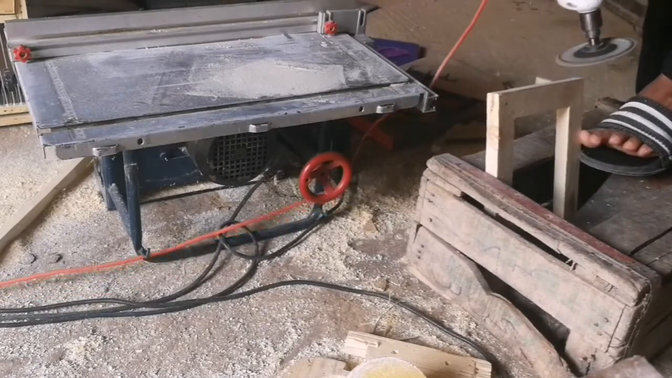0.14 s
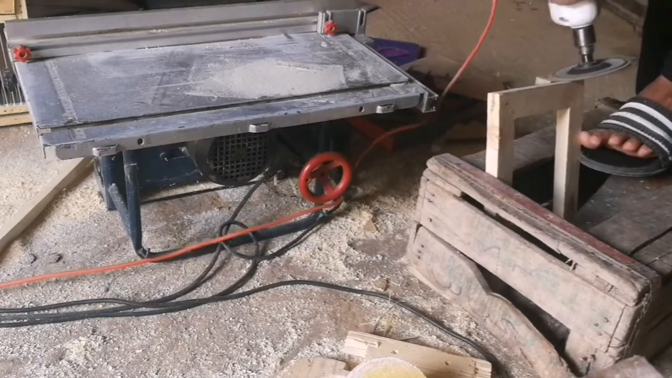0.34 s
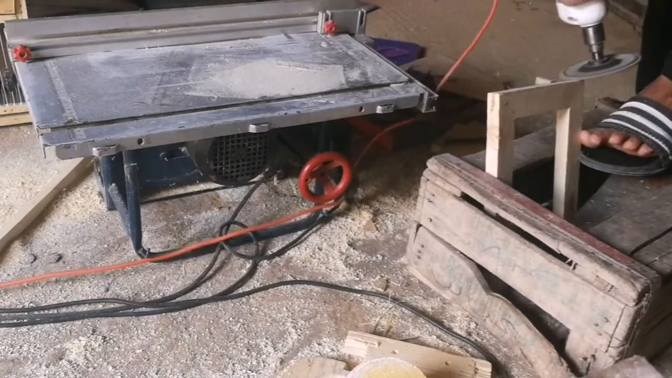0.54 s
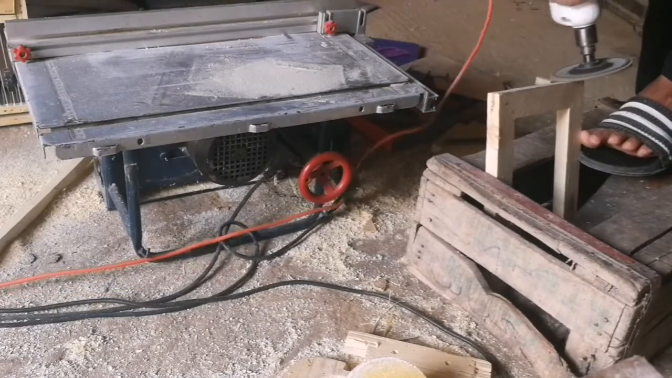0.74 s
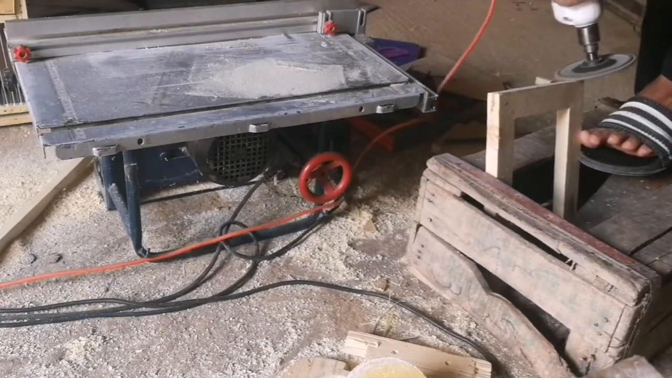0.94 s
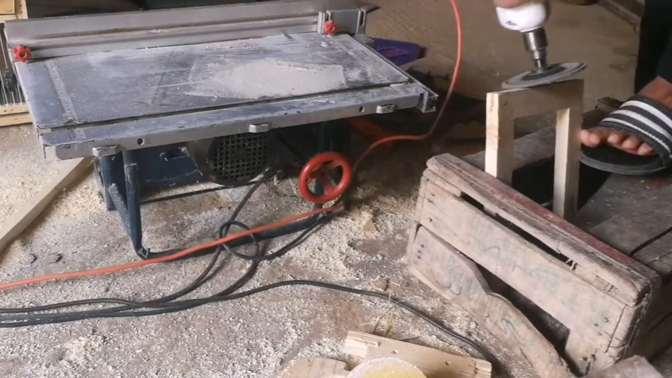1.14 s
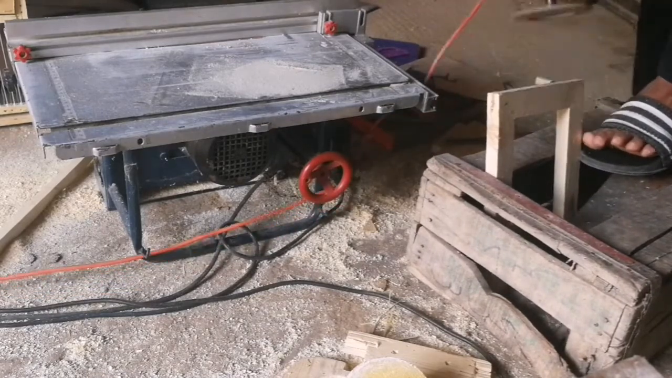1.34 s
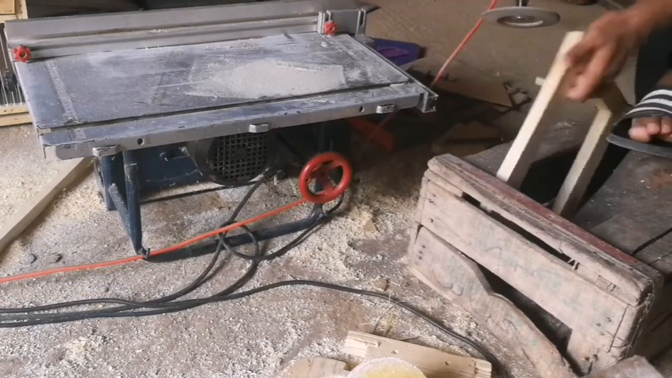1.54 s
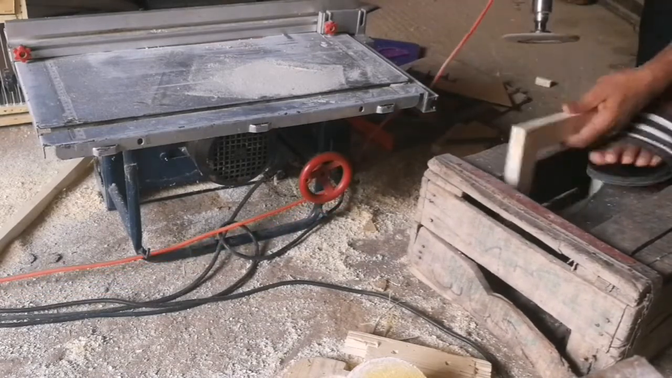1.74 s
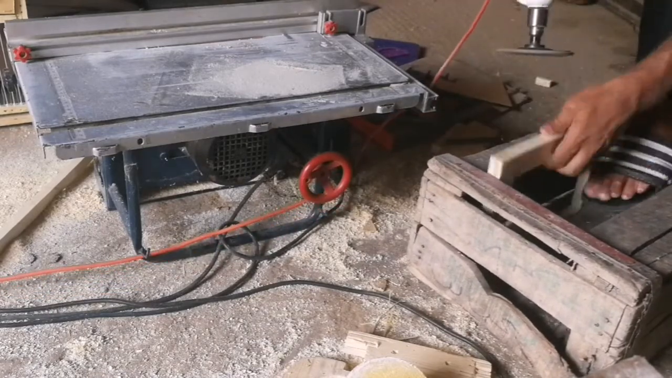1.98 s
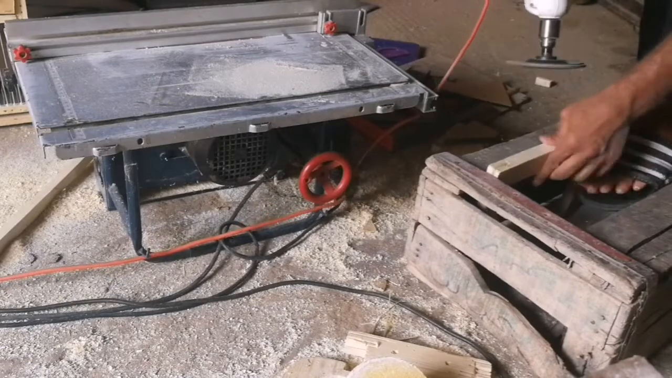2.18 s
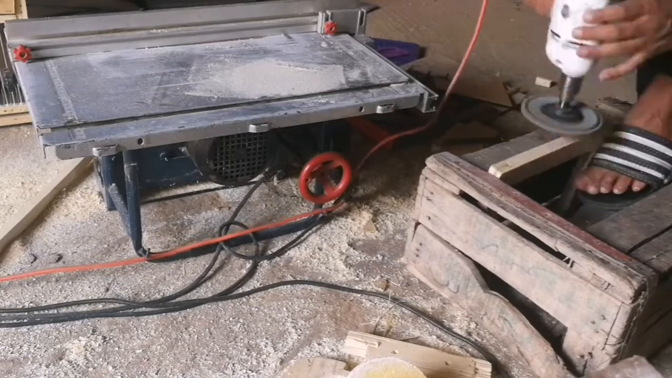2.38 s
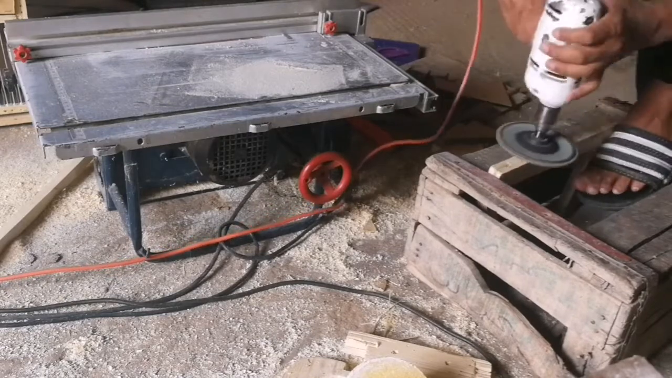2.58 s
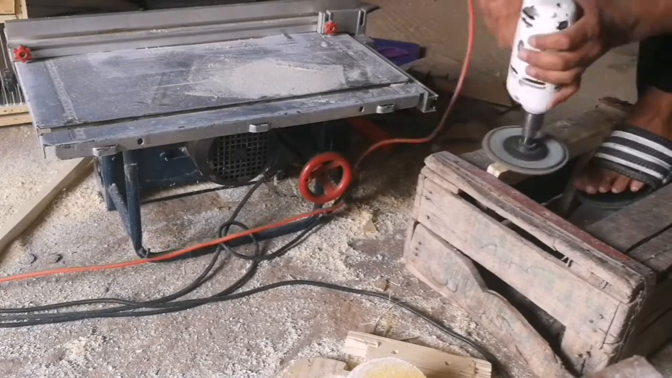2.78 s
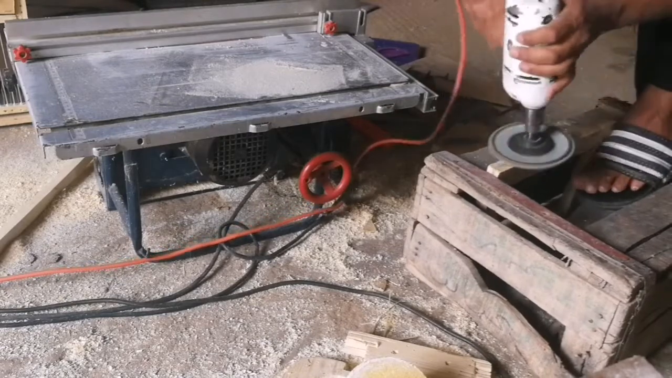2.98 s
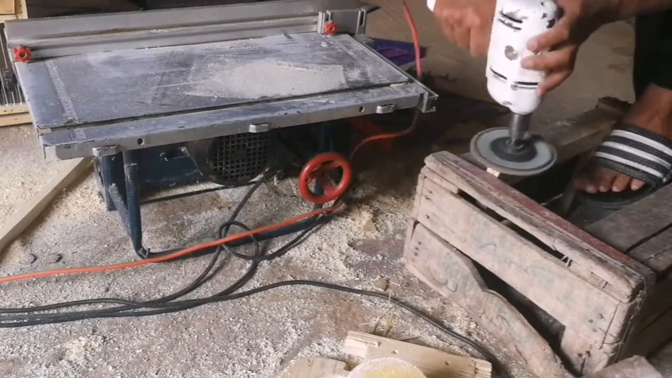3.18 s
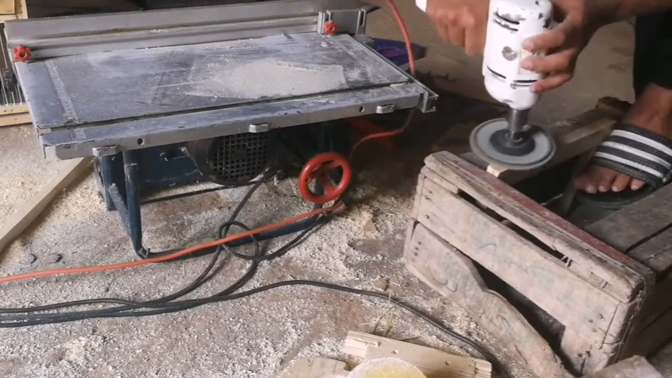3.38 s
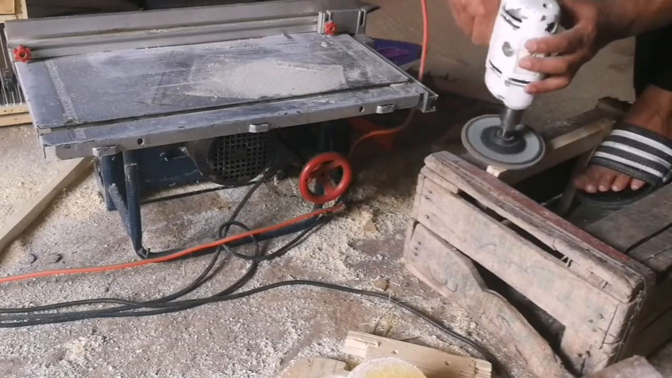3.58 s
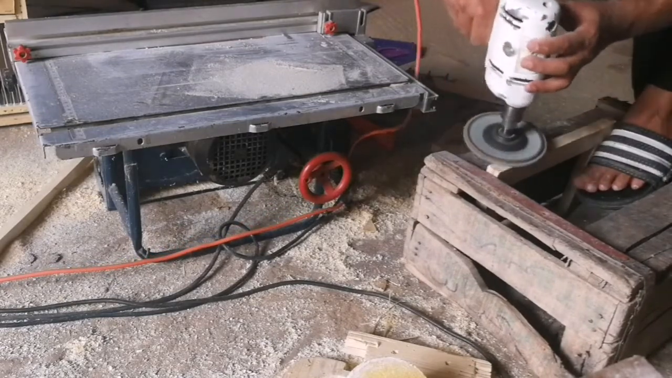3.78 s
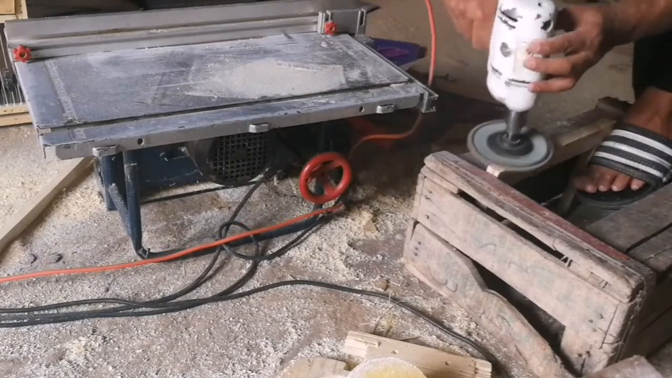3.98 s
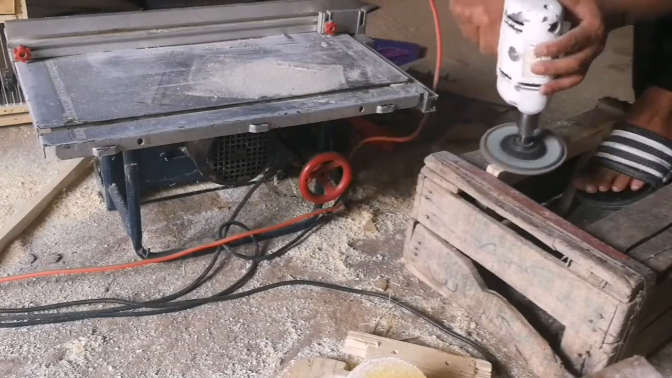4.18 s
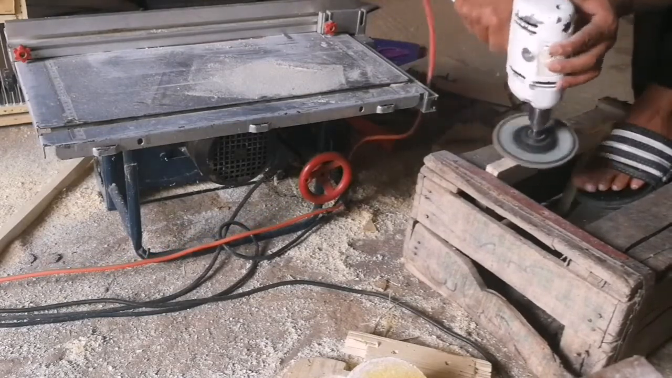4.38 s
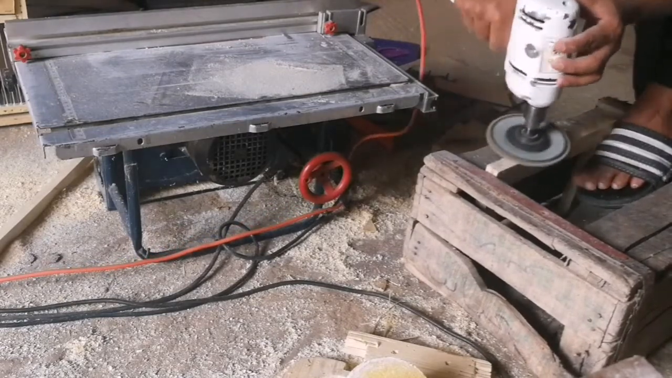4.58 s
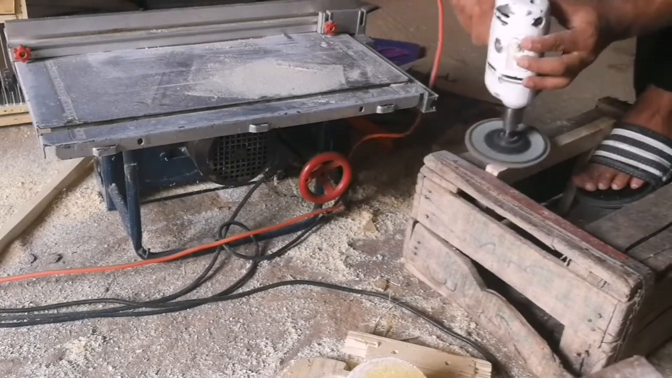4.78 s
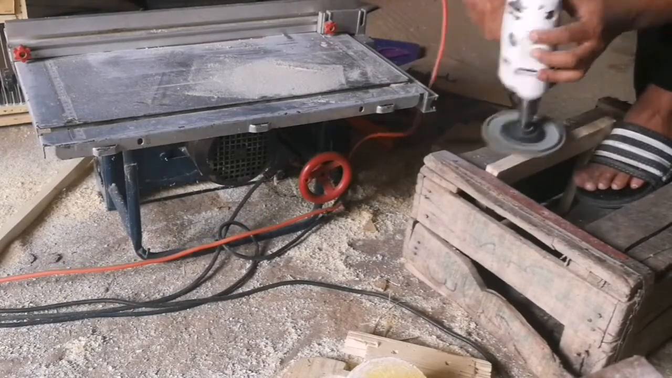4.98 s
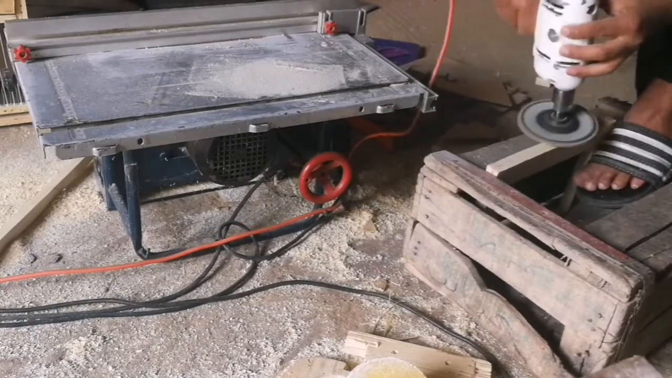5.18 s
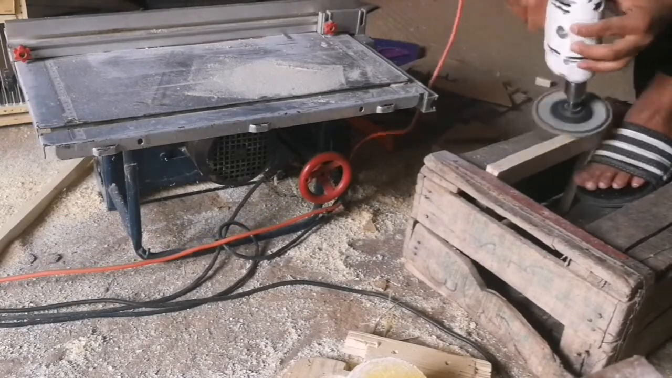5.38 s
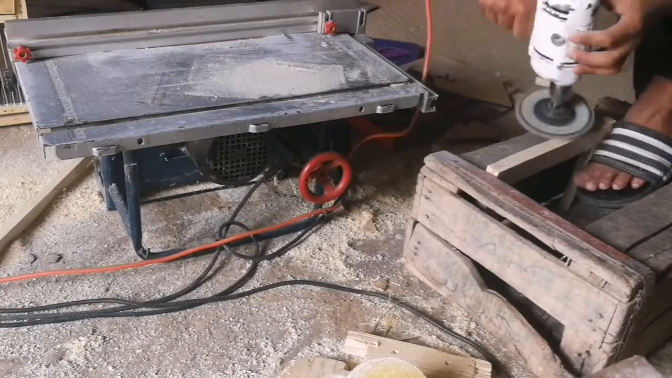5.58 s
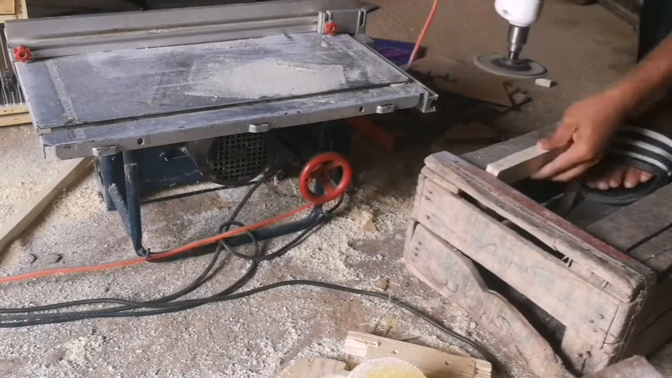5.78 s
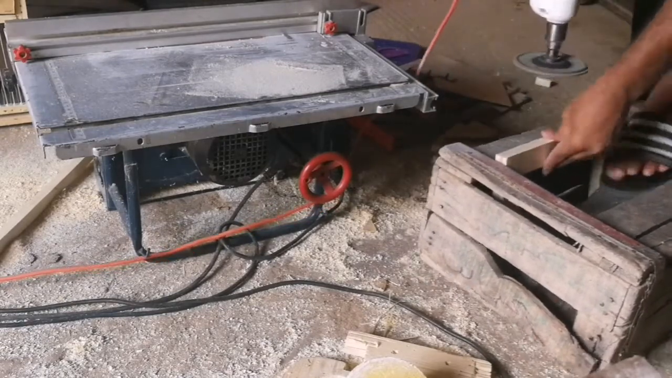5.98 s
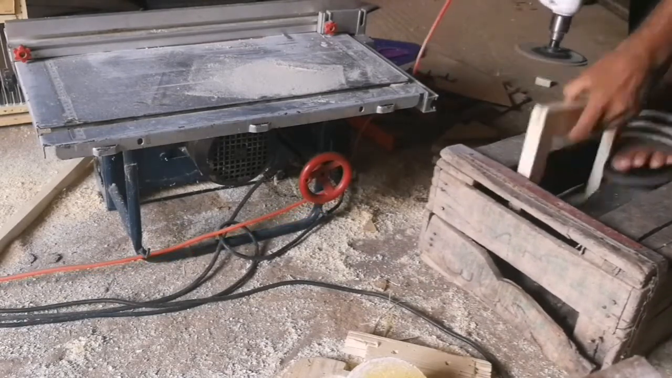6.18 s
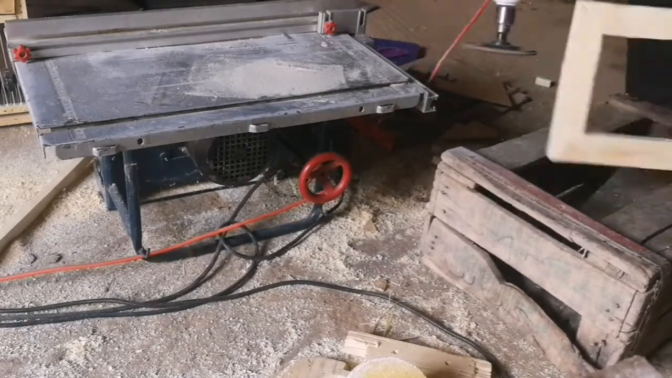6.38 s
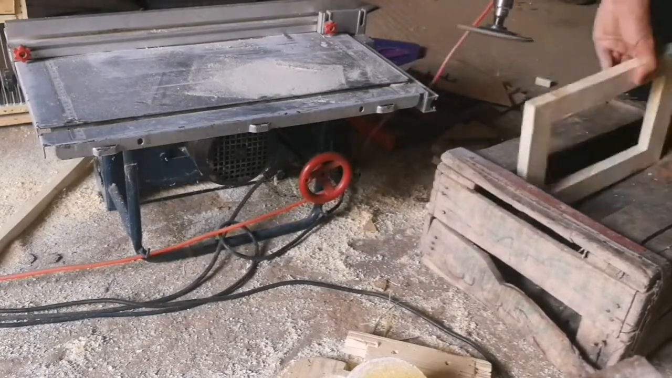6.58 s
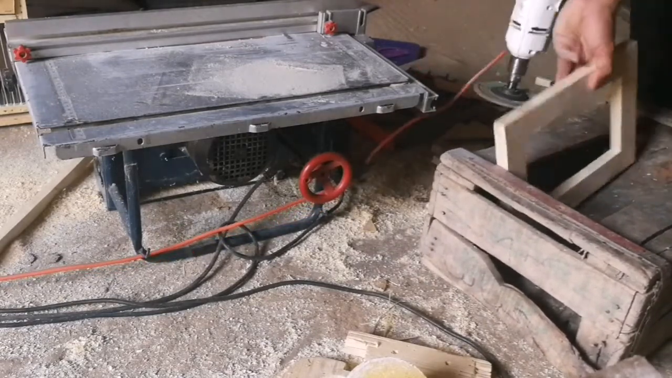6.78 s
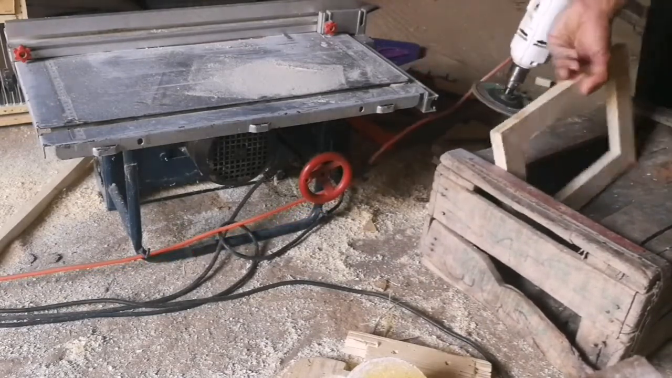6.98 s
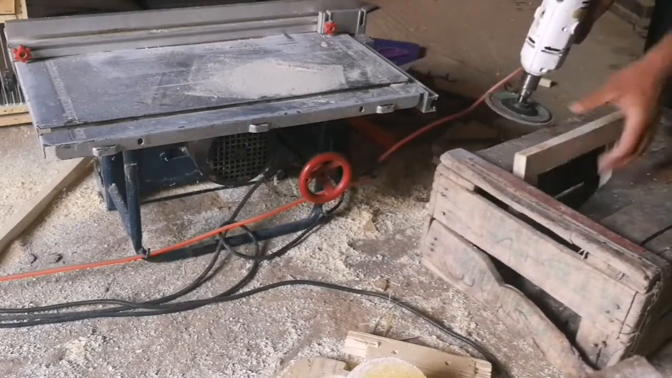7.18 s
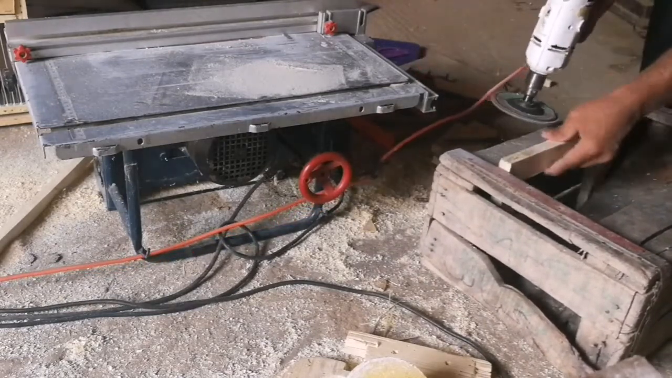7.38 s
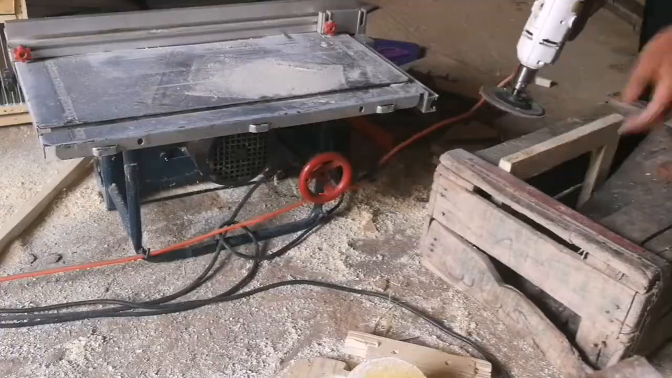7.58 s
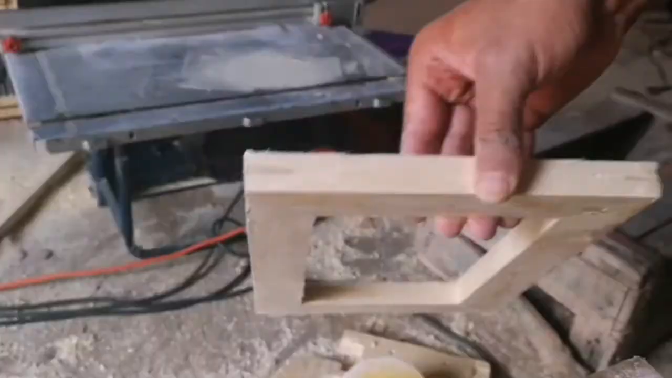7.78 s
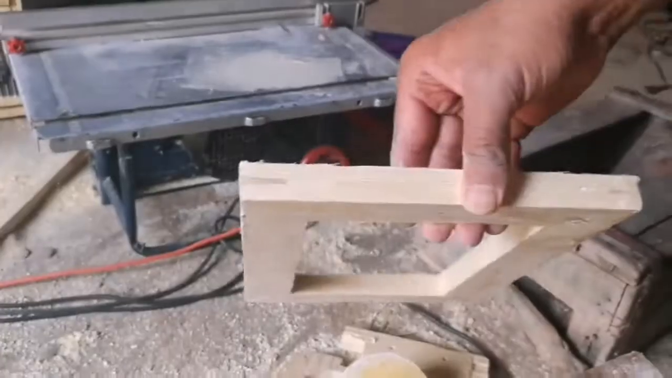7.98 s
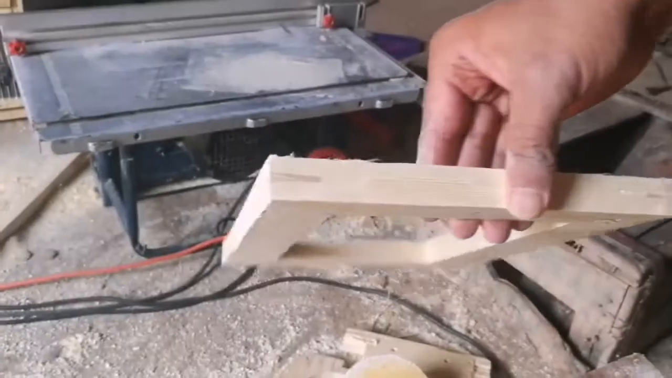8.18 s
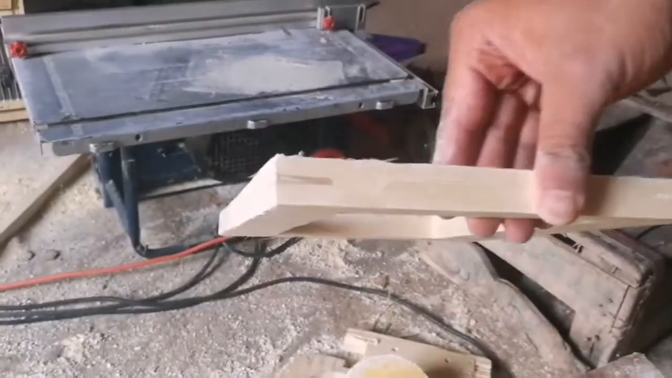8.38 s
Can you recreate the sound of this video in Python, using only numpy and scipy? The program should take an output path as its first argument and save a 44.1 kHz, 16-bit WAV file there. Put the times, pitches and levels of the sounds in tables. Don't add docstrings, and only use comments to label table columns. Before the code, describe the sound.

Close to the microphone in a bare workshop, a corded drill is already sanding wood at 0 s: bright fan whine, rushing air, low motor rumble and scratchy grit pulsing with each disc turn. Strong gear squeals cluster near 1.05-1.13 s. Released at about 1.3 s, it glides down in pitch and fades by 2.1 s, with soft thuds and a sharp wooden knock at 2.08 s. At 2.3 s it kicks up quickly, biting with chattering squeals around 2.5-2.9 s, then grinds unevenly, with further bites near 5-5.5 s. From 5.63 s it coasts down, nearly gone by 6.5 s, over muffled bumps. Hard, hollow frame knocks strike at 6.44, 6.77, 6.91, 7.08 and 7.27 s, with short room reflections, then quiet room hiss. Complete silence runs from 7.75 to 8.19 s, before a faint tap leaves a low wavering ring over room hiss.

```python
import sys
import numpy as np
from scipy import signal
from scipy.fft import rfft, irfft, next_fast_len
from scipy.io import wavfile
from scipy.ndimage import uniform_filter1d

SR = 44100
rng = np.random.default_rng(int(sys.argv[2]) if len(sys.argv) > 2 else 0)


def int16_out(signal):
    q = np.round(np.clip(np.atleast_2d(signal).T, -1, 1) * 32767)
    wavfile.write(sys.argv[1], SR, q.astype(np.int16))


def to_linear_factor(level_db):
    exponent = np.asarray(level_db, float) / 20
    return 10 ** exponent


N = 372204
T = np.arange(N) / SR
M = next_fast_len(N)
F = np.maximum(np.fft.rfftfreq(M, 1 / SR), 1)

# frequency [Hz], density [dB per Hz].
DRILL_COLOUR = [(35, -49), (60, -15), (240, -10.5), (334, -13), (403, -3.5), (644, -14), (1080, -3),
                (2290, -11), (3500, -7.5), (4030, -13), (5000, -11), (5900, -15), (6760, -11), (10300, -11),
                (15600, -7), (16500, -15)]
# frequency [Hz], density [dB per Hz].
SHOP_COLOUR = [(12, -28.5), (20, -20), (73, -11), (108, -23.5), (690, -30), (1350, -26.5), (2890, -34.5),
               (7300, -37.5), (14700, -47), (16500, -49)]
# frequency [Hz], left lead [rad].
PORT_LEAD = [(60, 0), (430, -.2), (780, 1.3), (1380, .2), (2330, 2.9), (3010, 5.2), (3530, 6.7),
             (4310, 9.7), (5510, 8.4), (5940, 9.8), (9820, 9.4), (14000, 7.5)]
# frequency [Hz], left minus right [dB].
PORT_SHADE = [(200, 0), (380, -3), (700, 4), (1290, -3.5), (2380, 11), (3400, 9.5), (4400, 15.5),
              (8120, 3.5), (15000, 3)]
# time [s], fan blade tone [Hz], disc pressure [dB], vents
# facing the phone [dB], gear load [dB].
PULLS = [
    [(0, 4896, 6, 2.5, -42.5), (.09, 5085, -1, -2, -48), (.23, 5320, 0, -2, -47.5),
     (.27, 5290, 11, -3, -40.5), (.36, 5140, 10, -1.5, -37.5), (.45, 4960, 9.5, -2, -37),
     (.65, 4870, 8.5, 0, -39.5), (.88, 4790, 9, 1.5, -40.5), (.93, 4836, 8, 1.5, -40.5),
     (1.02, 4790, 4.5, -1.5, -35), (1.07, 4830, -1.5, -7, -37.5), (1.13, 4890, 3.5, -1.5, -39),
     (1.2, 4820, 2, -1, -42), (1.29, 4945, 1, -1, -48)],
    [(2.515, 5322, 1.5, 5.5, -44), (2.54, 5296, 4.5, 6, -29.5), (2.7, 5079, 2, -3, -33),
     (2.87, 4920, 4, -1, -34), (3.03, 4730, 5, 2, -39.5), (3.1, 4735, 5, -0.7, -40),
     (3.22, 4930, 6, 1.9, -40), (3.5, 4720, 3.5, 1.5, -41.5), (3.75, 4550, 2, 2.5, -41.5),
     (3.95, 4640, 3.5, 2.5, -41.5), (4.14, 4605, 4, 3.5, -39), (4.28, 4435, 8.5, 1.5, -35.5),
     (4.42, 4476, 6.5, 1.4, -39), (4.6, 4570, 5.5, 1.8, -39.5), (4.77, 4670, 3.5, 0.5, -35.5),
     (4.86, 4575, 3, 2, -38), (5.03, 4610, 2.5, 0.5, -37), (5.24, 4810, 7, 1.2, -40),
     (5.33, 4794, 9.5, 4, -41), (5.4, 4695, 6, 2.1, -42.5), (5.5, 4800, 6, 1.8, -45),
     (5.63, 4880, 2.5, 0.5, -45.5)],
]
# time [s], fan whine [dB], once-a-turn hum [dB], twice-a-turn hum [dB].
TONE_LEVELS = [(0, -44, -51, -47), (.09, -44, -42, -39), (.23, -45, -43, -50), (.33, -47, -48, -45),
               (.46, -40, -56, -52), (.65, -42, -62, -57), (.9, -42.5, -53, -60), (1.03, -49, -53, -60),
               (1.11, -44, -52, -45), (1.17, -45, -49, -54), (1.28, -45, -44, -39), (1.37, -57, -62, -60),
               (1.53, -50, -70, -70), (1.72, -61, -70, -72), (1.92, -55, -75, -80), (2.1, -75, -85, -90),
               (2.32, -90, -90, -90), (2.39, -45, -62, -60), (2.47, -38, -55, -54), (2.56, -39.5, -48, -39),
               (2.63, -43, -45, -44), (2.69, -47, -58, -50), (2.74, -49, -56, -39), (2.87, -40, -56, -40),
               (2.95, -45, -54, -50), (3.05, -40, -47, -53), (3.2, -48, -50, -45), (3.45, -46, -51, -50),
               (3.7, -48, -56, -56), (4.15, -45, -56, -55), (4.4, -46, -51, -56), (4.75, -44, -57, -57),
               (5.03, -42, -58, -54), (5.33, -41, -50, -50), (5.5, -42.5, -53, -52), (5.56, -45, -56, -42),
               (5.66, -48, -58, -44), (5.8, -59, -66, -60), (5.93, -49.5, -70, -70), (6.12, -59, -70, -75),
               (6.3, -63, -80, -85), (6.5, -85, -90, -90)]
# time [s], added level [dB], length [s].
DISC_BITES = [(.02, 0.5, .02), (.076, -3, 0.015), (3.88, 2.5, 0.052), (4.12, 0, 0.062), (4.2, 4, .03),
              (4.3, -0.5, 0.025), (4.45, 3, 0.044), (4.72, -1, 0.037), (5.01, 6.5, 0.078), (5.16, 8, 0.02),
              (5.265, 7.5, 0.029), (5.375, 6.5, 0.046), (5.5, 2.5, 0.21)]
# start [s], level [dB], hold [s], fade [dB per s].
GRIT_OCTAVE = [
    (0.272, -33.5, 0.033, 21.5),
    (2.746, -39, 0.64, 48.5),
    (4.17, -43, 0.078, 16),
    (4.695, -39.5, 0.03, 93),
    (5.1, -49.5, .4, 32),
]
# time [s], pitch [Hz], peak [dB], length [s].
CATCHES = [(0.02, 3520, -29.5, 0.027), (0.313, 3680, -27.5, 0.012), (0.391, 3610, -25.5, 0.019),
           (1.048, 3440, -16.5, 0.022), (1.066, 3444, -16.5, 0.015), (1.09, 3510, -22, 0.0075),
           (1.111, 3456, -17.5, 0.026), (1.125, 3450, -19.5, 0.034), (1.206, 3440, -32, 0.047),
           (2.325, 2870, -33.5, 0.02), (2.341, 2690, -29, 0.025), (2.358, 2830, -32, .02),
           (2.376, 2940, -34.5, .02), (2.531, 3490, -25.5, .025), (2.552, 3520, -26, .02),
           (2.672, 3560, -22, 0.0055), (2.691, 3550, -19, 0.01), (2.718, 3450, -25, 0.016),
           (2.744, 3460, -21, 0.0096), (2.77, 3470, -23.5, 0.052), (2.834, 3506, -20, 0.0073),
           (2.976, 3370, -22, 0.014), (3.113, 3390, -23.5, 0.016), (3.178, 3460, -24, 0.0047),
           (3.203, 3470, -27.5, 0.01), (3.25, 3460, -26, 0.0092), (3.277, 3410, -29, 0.007),
           (3.389, 3470, -28, .01), (3.419, 3400, -29.5, .015), (3.631, 3430, -31, .01),
           (3.714, 3130, -29.5, 0.01), (3.949, 3320, -27, 0.011), (4.047, 3150, -30, 0.0092),
           (4.345, 3210, -28, 0.009), (4.559, 3180, -25.5, 0.011), (4.71, 3150, -30, 0.011),
           (4.97, 3220, -27.5, 0.014), (5.047, 3210, -32, .008), (5.156, 3190, -25, .008),
           (5.207, 3470, -24, .008), (5.251, 3400, -22, 0.02), (5.34, 3360, -28.5, 0.011),
           (5.486, 3410, -33, .012), (3.876, 3130, -28.5, 0.022), (4.248, 3090, -33, 0.028),
           (4.429, 3100, -29.5, 0.015), (4.576, 3190, -25.5, 0.023), (4.766, 3330, -24.5, 0.011),
           (5.135, 3340, -22.5, 0.019), (5.225, 3447, -22, .009), (5.272, 3320, -19, 0.009),
           (5.363, 3420, -28.5, .02)]
# start [s], peak [dB], ring [Hz].
SOFT_THUDS = [(0.04, -41, 300), (1.573, -38.5, 240), (1.755, -43, 301), (1.987, -33, 150), (2.6, -44, 240),
              (2.75, -44, 220), (2.83, -45, 150), (5.55, -45, 200), (5.707, -42, 446), (5.818, -30.5, 232),
              (5.955, -37.5, 253), (6.184, -44.5, 338), (6.452, -39, 252), (6.55, -41, 260),
              (6.657, -42, 286), (6.776, -39, 250), (7.077, -27, 460), (7.268, -55, 238)]
# start [s], peak [dB], ring [Hz], treble [dB], rise [ms].
FRAME_KNOCKS = [(2.084, -20.5, 1030, -35.5, 0.66), (2.088, -27.5, 2590, -38, 1.2),
                (2.101, -35.5, 400, -22, 8.7), (2.144, -44, 1530, -6, 3.8), (6.444, -19, 2700, -15, 0.61),
                (6.454, -19, 1990, -26, 1.34), (6.507, -39, 1150, -25, 18), (6.535, -30, 1910, -22, 11),
                (6.574, -45, 2160, -23.5, 28), (6.634, -40.5, 338, -20, 6.6), (6.657, -25.5, 480, -17.5, 4),
                (6.764, -36, 900, -11.5, 5.1), (6.773, -21, 700, -19, 3.1), (6.785, -30, 1300, -20, 2.8),
                (6.856, -29, 480, -20, 11.7), (6.911, -15, 1180, -24.5, 0.65),
                (6.918, -19.5, 1240, -18, 1.2), (6.926, -23, 1150, -19.5, 0.8), (6.975, -23, 920, -21, 9.1),
                (7.035, -43, 2230, -7, 19), (7.076, -18, 790, -38, 0.39), (7.085, -25.5, 800, -32, 2.4),
                (7.104, -42, 733, -35, 12.6), (7.149, -53.5, 300, -29, 16), (7.216, -47.5, 800, -21, 4.6),
                (7.239, -49, 1200, -6.5, 20), (7.268, -18.5, 973, -19, 0.4), (7.286, -16.5, 1070, -39, 2.5),
                (7.38, -55, 1360, -19, 8.8), (7.419, -53.5, 1420, -14, 17), (7.626, -48.5, 1650, 8, 9.4)]
# frequency [Hz], level [dB], decay by 60 dB [s].
WOOD_MODES = [(504, 5, 0.028), (800, -3.5, 0.03), (1046, 16, 0.022), (1372, 9, 0.0266), (1806, 4, 0.053),
              (2230, 5.5, 0.02), (2620, -4.5, 0.014), (3350, -14, 0.012), (3720, -13.5, 0.012)]
# frequency [Hz], level [dB], decay by 60 dB [s], left minus right [dB].
STAND_MODES = [
    (233, -46, 0.86, -12),
    (269, -48.5, 1.4, 15),
]

GAP_START_S, GAP_END_S, TAP_S = 7.75, 8.187, 8.189

PULLED_S = -1.5, 2.304
KICK_SHARE, SPIN_UP_S = .41, .115
INRUSH_S = 0.0078
COAST_S, FRICTION_HZ = 1.8, 5300
LIFT_S, LIFT_DB = 0.013, -2.5
FULL_HZ = 4900
BLADES, GEAR_RATIO, TEETH_PER_BLADE = 12, 9.5, .707
GEAR_LEAD = .05
LOW_HZ, MID_HZ, HIGH_HZ = 670, 2500, 9900


def on_hz(table):
    hz, value = np.transpose(table)
    return np.interp(np.log(F), np.log(np.maximum(hz, 1)), value)


def unit(x):
    return x / np.sqrt(np.mean(x ** 2))


def shape(x, gain):
    return irfft(rfft(x, M) * gain, M)[..., :N]


def walk(rate):
    k = int(SR / rate)
    steps = np.repeat(rng.standard_normal(N // k + 1), k)
    return 1.3 * uniform_filter1d(uniform_filter1d(steps, k), k)[:N]


def band(x, lo_hz, hi_hz):
    edge = 1 / np.sqrt((1 + (lo_hz / F) ** 16) * (1 + (F / hi_hz) ** 16))
    return unit(shape(x, edge * to_linear_factor(on_hz(DRILL_COLOUR))))


def ring(x, hz, t60):
    pole = np.exp(2j * np.pi * hz / SR - np.log(1000) / (t60 * SR))
    return signal.lfilter([1], [1, -pole], x).imag


def ringing_noise(hz, *t60s):
    x = rng.standard_normal(N)
    for t60 in t60s:
        x = ring(x, hz, t60)
    return unit(x)


def bumps(rows, t=T):
    total = 0
    for s, size, length in rows:
        spread = length * np.where(t < s, 0.27, 0.45)
        total = total + size * np.exp(-((t - s) / spread) ** 2)
    return total


def shop():
    mid, side = rng.standard_normal((2, N))
    both = mid + shape(side, np.clip(F / 500, .2, 1)) * np.array([[1], [-1]])
    return to_linear_factor(-64.5 + 0.4 * walk(2.5)) * unit(shape(both, to_linear_factor(on_hz(SHOP_COLOUR))))


def trigger():
    out = np.zeros((7, N))
    for rows, pulled in zip(PULLS, PULLED_S):
        s, *cols = np.transpose(rows)
        hz, press_db, facing_db, load_db = (np.interp(T, s, c) for c in cols)
        since = np.maximum(T - s[-1], 0)
        on = np.maximum(T - pulled, 1e-5)
        torque = (1 - KICK_SHARE) * np.exp(-on / SPIN_UP_S)
        drive = 1 - np.exp(-(on / INRUSH_S) ** 2 / 2)
        hz = hz * (1 - torque)
        hz = np.maximum((hz + FRICTION_HZ) * np.exp(-since / COAST_S) - FRICTION_HZ, 1)
        power = np.exp(-since / LIFT_S)
        press_db = press_db + LIFT_DB * (1 - power)
        effort = hz * drive / (1 - 0.5 * torque)
        out = np.where(T >= pulled, [hz, press_db, facing_db, load_db, power, torque, effort], out)
    return out


def with_speed(db, steepness, effort):
    return db + 20 * steepness * np.log10(effort / FULL_HZ)


def armature_turns(fan_hz, power):
    uneven = (.006 - .003 * power) * walk(60) + .004 * power * walk(22)
    return np.cumsum(fan_hz * (1 + uneven)) / BLADES / SR


def motor_tones(turns):
    s, *levels = np.transpose(TONE_LEVELS)
    whine_db, once_db, twice_db = (np.interp(T, s, db) for db in levels)
    whine = to_linear_factor(whine_db + 3.2 * walk(45)) * np.sin(2 * np.pi * BLADES * turns)
    twice = to_linear_factor(twice_db + 2.5 * walk(25)) * np.sin(4 * np.pi * turns)
    once = to_linear_factor(once_db - 2 + 3 * walk(31)) * np.sin(2 * np.pi * turns)
    return whine + twice + once


def drone(disc, facing_db, power, effort):
    level_db = with_speed(-54.5, 1.2, effort) - 0.2 * facing_db - 3 * (1 - power)
    rumble = band(rng.standard_normal(N), 52, LOW_HZ) * to_linear_factor(level_db + 0.5 + 1.2 * disc + 2.2 * walk(14))
    upright = (T > .33) & (T < 1.12)
    drum = to_linear_factor(-58.5 + 2.8 * walk(25)) * upright * ringing_noise(243, .1)
    lying = uniform_filter1d(1. * ((T > 2.85) & (T < 5.05)), size=6000)
    crate = lying * to_linear_factor(-54.5 + 1.9 * disc + 1.14 * walk(11)) * band(rng.standard_normal(N), 60, 610)
    return rumble + drum + crate


def casing(shaft, disc, facing_db, bite_db, effort):
    level_db = with_speed(-40.5, 1.55, effort) + 0.35 * facing_db + 0.34 * bite_db
    noise = band(rng.standard_normal(N) * to_linear_factor(2.6 * shaft), LOW_HZ, MID_HZ)
    gearcase = to_linear_factor(with_speed(-54, 1.32, effort)) * ringing_noise(3501.5, 1.8 / 700, 1.8 / 700)
    return noise * to_linear_factor(level_db + 1.8 * disc + 0.42 * walk(14)) + gearcase


def vents(shaft, disc, press, facing_db, bite_db, effort):
    level_db = with_speed(-38, 2.85, effort) + facing_db + 0.75 * bite_db
    air = band(rng.standard_normal(N) * to_linear_factor(3.9 * shaft), MID_HZ, HIGH_HZ)
    air *= to_linear_factor(level_db - 0.3 + 2.87 * disc + 0.39 * press)
    slot = to_linear_factor(with_speed(-48, 1.68, effort)) * ringing_noise(9350.5, 2.2 / 799, 1.2 / 799)
    return air + slot


def grit(disc, press, press_db, bite_db, effort):
    level_db = with_speed(-44, 2.44, effort) + press_db + bite_db
    grain_size = np.minimum(rng.exponential(size=N), 5.)
    grains = rng.standard_normal(N) * to_linear_factor(3.24 * grain_size)
    return band(grains, HIGH_HZ, 20000) * to_linear_factor(level_db - 3.5 + 2.6 * disc + 0.83 * press)


def gears(disc, fan_hz, load_db, power, torque):
    size = power * to_linear_factor(load_db)
    hz = TEETH_PER_BLADE * fan_hz / (1 - GEAR_LEAD * torque) * (1 + .014 * walk(25))
    phase = 2 * np.pi * np.cumsum(hz * (1 + .012 * walk(70))) / SR
    firm = np.clip((20 * np.log10(size + 1e-9) + 36) / 10, 0, 1)
    swell = to_linear_factor(np.minimum((2.5 - firm) * (3.07 * disc + 2.4 * walk(120)), 12.))
    near, wide = (unit(signal.lfilter([1], [1, -2 * k, k * k], rng.standard_normal(N))) for k in (.92, .94))
    tone = (.66 + .3 * firm) * unit(swell * np.sin(phase))
    skirt = (.95 - .6 * firm) * near * np.cos(phase)
    sing = 0
    for s, db, hold, fade in GRIT_OCTAVE:
        rise_db = 248.5 * np.maximum(s - T, 0)
        sing = sing + to_linear_factor(db - rise_db - fade * np.maximum(T - s - hold, 0))
    octave = sing * power * to_linear_factor(8.1 * disc) * wide * np.cos(2 * phase)
    return size * (tone + skirt) + octave


def squeals():
    out = np.zeros(N)
    waver = 2 * np.pi * np.cumsum(25 * walk(60)) / SR
    for s, hz, db, length in CATCHES:
        near = slice(max(int((s - .15) * SR), 0), int((s + .15) * SR))
        swell = bumps([(s, to_linear_factor(db), length)], T[near])
        out[near] += swell * np.sin(2 * np.pi * hz * T[near] + waver[near])
    return out


def thuds():
    out, t = np.zeros(N), np.arange(6000) / SR
    for s, db, hz in SOFT_THUDS:
        push = rng.standard_normal(len(t)) * t * np.exp(-t / 0.0055)
        thud = unit(ring(push, hz, 0.035)) + 0.5 * unit(ring(push, 2.0 * hz, 0.019))
        thud += .22 * unit(ring(push, 145, 0.09))
        thud = signal.lfilter(*signal.butter(2, 100, "high", fs=SR), thud)
        i = int(s * SR)
        out[i:i + len(t)] += to_linear_factor(db + 1.5) * thud / np.abs(thud).max()
    return out


def knocks():
    out, t = np.zeros(N + 8192), np.arange(6000) / SR
    ms = 1e3 * t
    for s, db, hz, treble_db, rise_ms in FRAME_KNOCKS:
        rub, hiss = rng.standard_normal((2, len(t)))
        burst_ms = 6.5 + 1.45 * rise_ms
        force = np.minimum(ms / max(rise_ms, .2), 1) ** 1.5 * np.exp(-(ms / burst_ms) ** 1.9)
        rub = rub + 0.46 * 9 / (1 + rise_ms ** 2) * np.exp(-((ms - rise_ms) / 0.054) ** 2)
        wood = 0
        for f, mode_db, t60 in WOOD_MODES:
            detune, uneven = rng.standard_normal(2)
            mode = unit(ring(rub * force, f * (1 + 0.072 * detune), t60))
            wood = wood + to_linear_factor(mode_db + 2.7 * np.tanh(uneven)) * mode
        body = unit(wood) + 1.4 * unit(ring(rub * force, hz, 0.017))
        body += 0.95 * unit(ring(hiss * force, 1.02 * hz + 500, 0.0017))
        body = signal.lfilter(*signal.butter(3, [190, 4000], "band", fs=SR), body)
        crack = signal.lfilter(*signal.butter(2, [2600, 9500], "band", fs=SR), hiss * force)
        i = int(s * SR)
        blow = body / np.abs(body).max() + to_linear_factor(treble_db) * crack / np.abs(crack).max()
        out[i:i + len(t)] += to_linear_factor(db) * blow
    return out[:N]


def ports(x):
    half = to_linear_factor(on_hz(PORT_SHADE) / 2) * np.exp(.5j * on_hz(PORT_LEAD))
    return shape(x, np.array([half, 1 / half]) / np.sqrt(1 + (110 / F) ** 4))


def scatter(x, drift):
    gain = to_linear_factor(-4 + 0.32 * np.log2(F / 2000)) / np.sqrt(1 + (300 / F) ** 4)
    moving, quarter = shape(x, np.array([gain, 1j * gain]))
    out = np.zeros((2, N))
    for k, lag in enumerate(rng.integers(100, 700, 6)):
        turn = 3.37 * walk(drift)
        out[k % 2] += np.roll(moving, lag) * np.cos(turn) + np.roll(quarter, lag) * np.sin(turn)
    return out


def walls(x):
    t = np.arange(8000) / SR
    tail = rng.standard_normal((2, len(t))) * to_linear_factor(-60 * t / 0.11) * (t > .003)
    tail[1] += signal.lfilter(*signal.butter(2, 500, fs=SR), tail[0] - tail[1])
    tail = signal.lfilter(*signal.butter(2, 150, "high", fs=SR), tail)
    return signal.fftconvolve(x[None], tail / np.linalg.norm(tail[0]) * to_linear_factor(-8))[:, :N]


def stand():
    tap = 1. * (np.arange(N) == int(TAP_S * SR))
    out = to_linear_factor(-50) * ring(tap, 240, 0.028)
    for k, (hz, db, t60, pan_db) in enumerate(STAND_MODES):
        level = to_linear_factor(db + np.array([[pan_db], [-pan_db]]) / 2)
        sign = np.array([[1], [1 - 2 * k]])
        out = out + level * sign * ring(tap, hz, t60)
    return out


def scene():
    fan_hz, press_db, facing_db, load_db, power, torque, effort = trigger()
    turns = armature_turns(fan_hz, power)
    shaft = np.cos(2 * np.pi * turns)
    disc = np.cos(2 * np.pi * turns / GEAR_RATIO + 0.43 * walk(5.3))
    bite_db = bumps(DISC_BITES)
    press = walk(11)
    whirr = drone(disc, facing_db, power, effort) + casing(shaft, disc, facing_db, bite_db, effort)
    whirr += vents(shaft, disc, press, facing_db, bite_db, effort)
    whirr += grit(disc, press, press_db, bite_db, effort)
    tones = motor_tones(turns)
    mesh = gears(disc, fan_hz, load_db, power, torque)
    clean = squeals()
    frame = thuds() + knocks()
    work = ports(whirr + mesh + frame + clean + tones)
    work += scatter(whirr, 60)
    work += scatter(0.74 * mesh + 0.39 * clean + tones / 5, 9)
    work += walls(frame)
    return work * (T < GAP_START_S) + stand() + shop()


def low_pass(x):
    return signal.sosfilt(signal.butter(12, 16980, fs=SR, output="sos"), x)


def record(dry):
    top = 1 / np.sqrt(1 + (F / 15850) ** 400)
    heard = (T < GAP_START_S) | (T > GAP_END_S)
    return low_pass(shape(dry, top) * heard)


dry = scene()
out = record(dry)
int16_out(out)
```